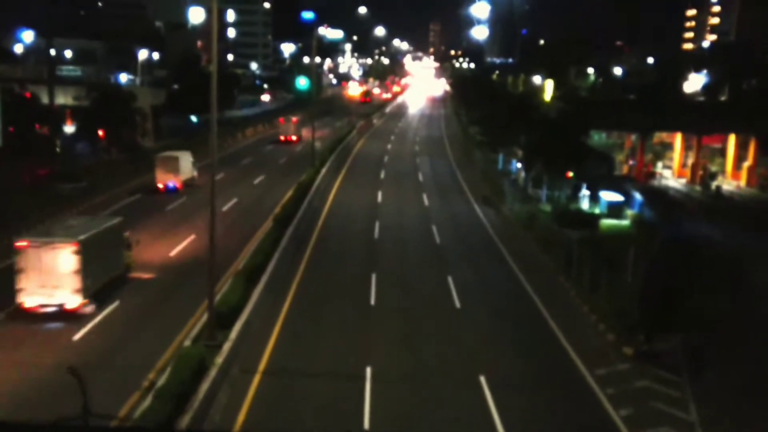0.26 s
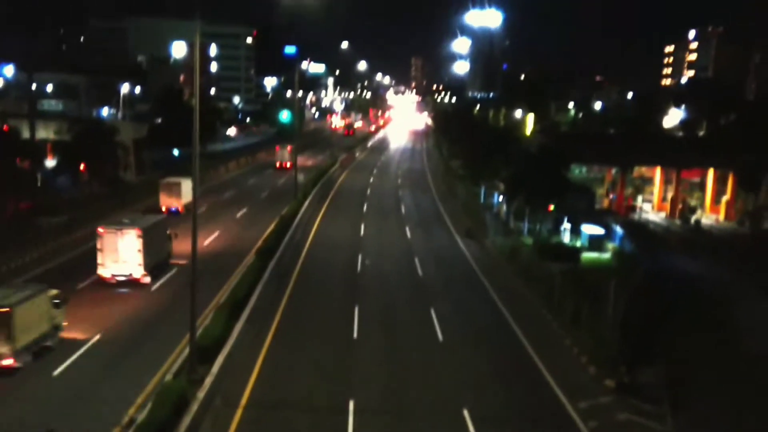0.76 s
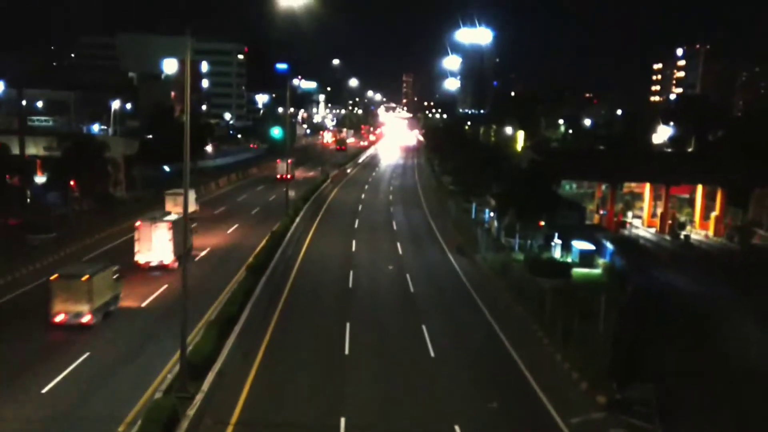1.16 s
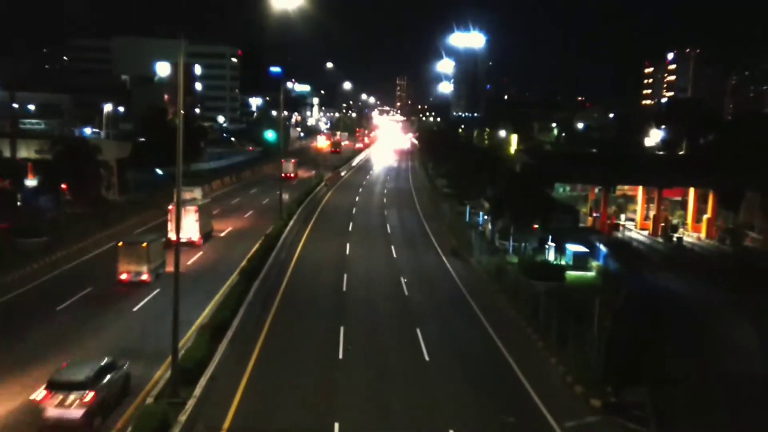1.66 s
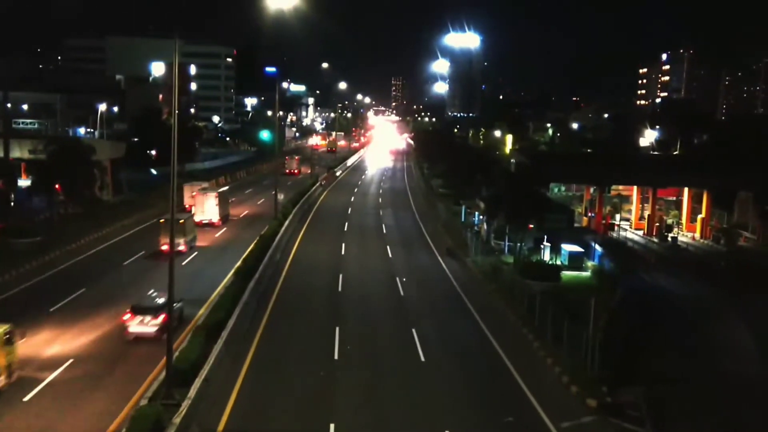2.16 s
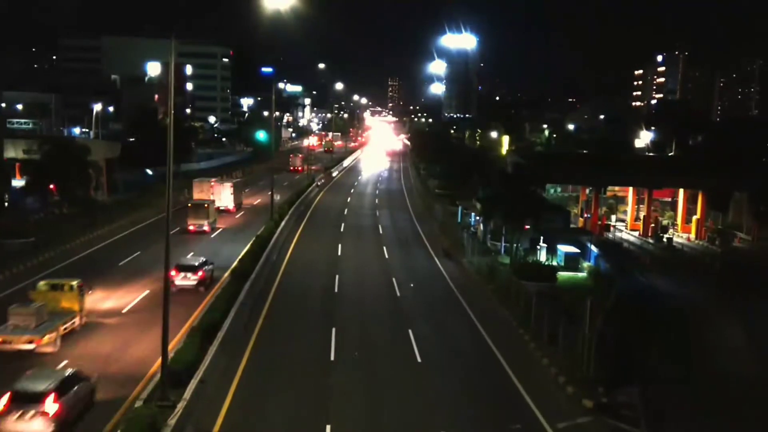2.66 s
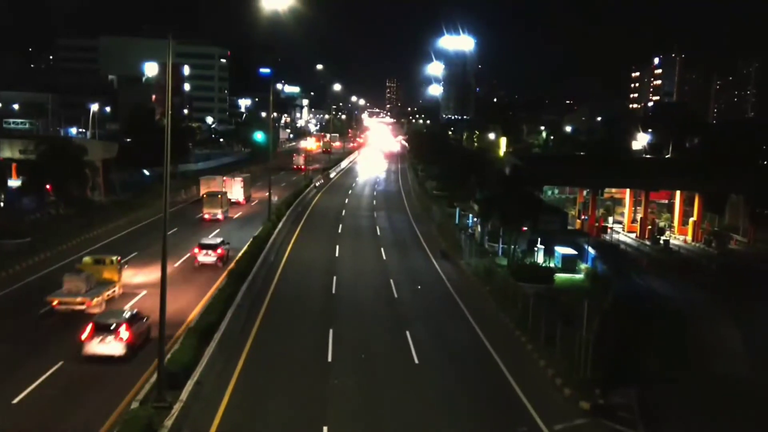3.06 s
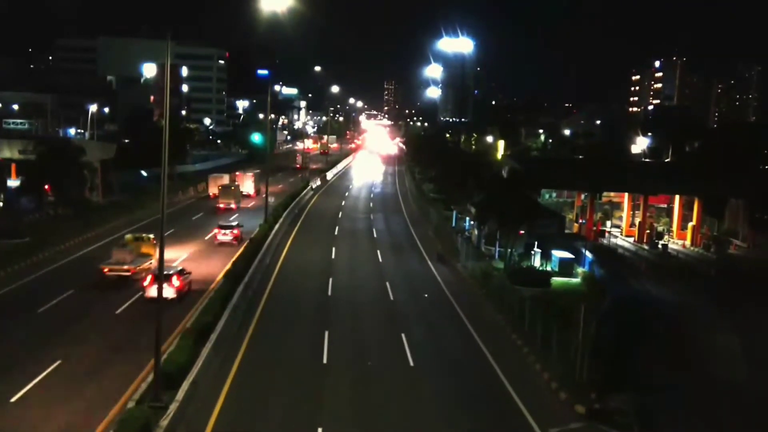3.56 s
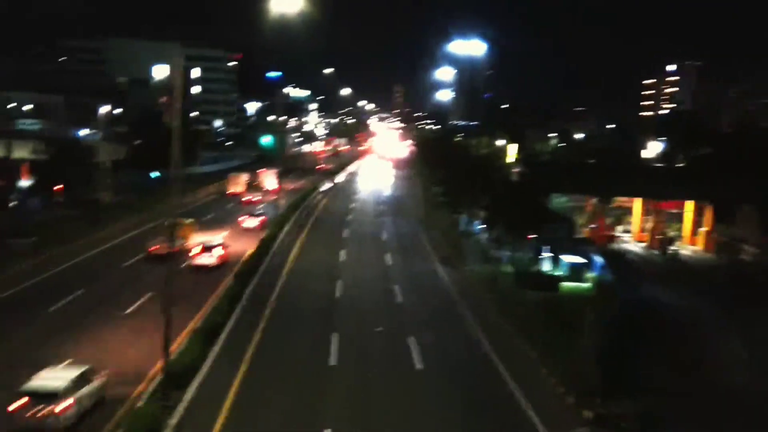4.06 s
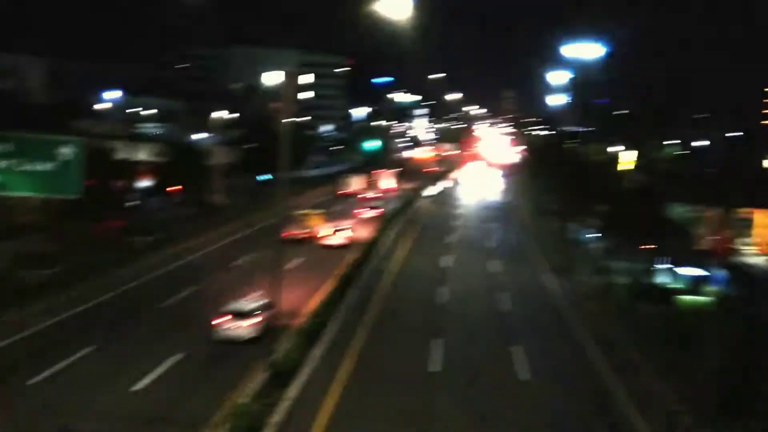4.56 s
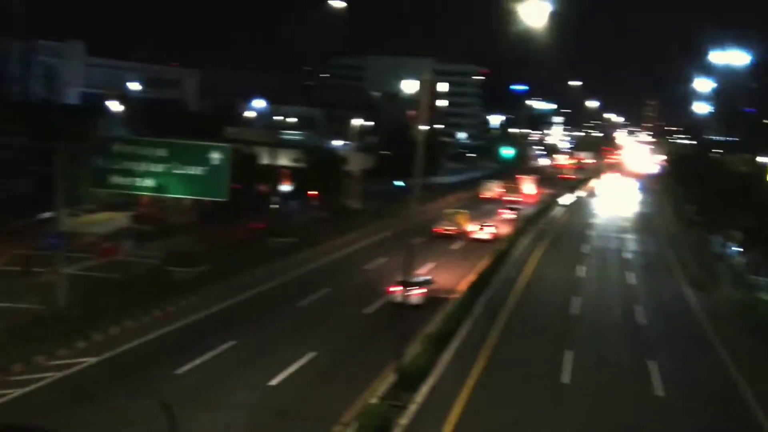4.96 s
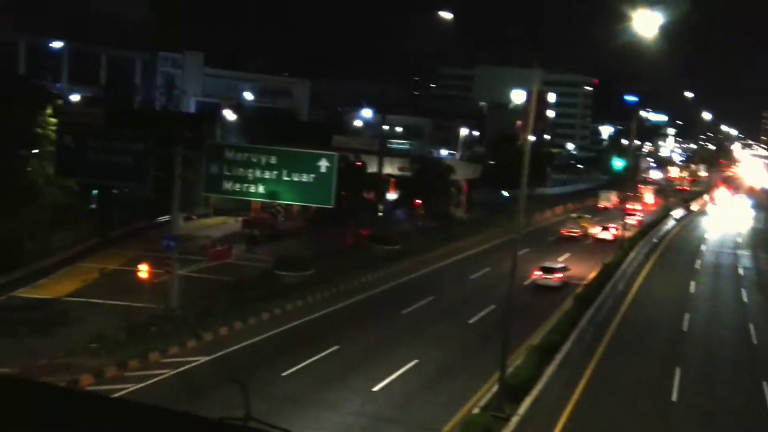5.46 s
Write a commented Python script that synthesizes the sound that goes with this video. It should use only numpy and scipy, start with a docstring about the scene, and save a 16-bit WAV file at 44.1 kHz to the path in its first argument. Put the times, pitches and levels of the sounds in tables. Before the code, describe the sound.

Night highway traffic heard from a footbridge: rumbling trucks and hissing tyres pass below, then thin to a distant roar as wind buffets the microphone.

```python
"""Night traffic below a footbridge

Broadband tyre and body noise is shaped from random spectra, with short inverted echoes close to
the microphones. Truck engines drone as harmonics of a crank; engine notes and a thin whistle glide
as enveloped sines. Wind, mostly later, is filtered noise and short slaps at two hand-held ports."""
import sys
import numpy as np
from scipy import signal
from scipy.io import wavfile
from scipy.ndimage import uniform_filter1d, minimum_filter1d

SR = 44100
rng = np.random.default_rng(int(sys.argv[2]) if len(sys.argv) > 2 else 0)


def log_audio(samples):
    """Write samples as a 16-bit WAV file to the path given in sys.argv[1]."""
    # one column per channel
    frames = np.atleast_2d(samples).T
    # limit to full scale, then quantise
    limited = np.clip(frames, -1, 1)
    pcm = np.round(limited * 32767).astype(np.int16)
    wavfile.write(sys.argv[1], SR, pcm)


N = 251811  # samples

# Spectral densities of the traffic, each a near and a far curve: f/Hz, relative level/dB
RUMBLE_SPECTRA = [(15, -47), (25, -14), (75, -4), (147, -10.5), (167, -5.5), (285, -16.5), (362, -12),
                  (436, -20), (600, -21.5), (780, -21.5), (1320, -120)], [(15, -35), (25, 6), (70, 0.5),
                  (108, -2), (194, -9.5), (260, 2), (321, 2), (600, -17.5), (780, -41), (1320, -120)]
ROAR_SPECTRA = [(280, -25), (480, -7), (520, -0.5), (651, -16), (904, 2), (1330, -3), (1900, -51),
                (2470, -14.5), (4180, -120)], [(280, -48), (480, -2.5), (797, -2.5), (1080, 1), (1320, 0.5),
                (1710, -18), (1900, -7), (2470, -19.5), (4180, -120)]
SWISH_SPECTRA = [(880, -10.5), (1500, -5.5), (1720, -7.5), (1830, -9.5), (2210, -12), (4000, -22),
                 (5200, -24), (8800, -120)], [(880, -74), (1500, -2), (1720, -5), (1950, -8), (2180, -5.5),
                 (2450, -13), (2990, -12), (3170, -13.5), (4000, -39.5), (5200, -29.5), (8800, -120)]
HISS_SPECTRA = [(1940, -7), (3300, -2.5), (4450, -10), (5130, -2), (6090, -7.5), (7190, -5), (8710, -3),
                (11000, -9), (12200, -12), (14500, -23), (15200, -37)], [(1940, -35), (3300, -5),
                (4320, 18.5), (5060, 2), (5640, -4.5), (6580, 15.5), (7760, 8), (9110, 12), (12900, -6.5),
                (15200, -36)]
# Boom of a lorry's box body, and a band of tyre song: f/Hz, relative level/dB
BOX_SPECTRUM = [(270, -56), (315, -28), (345, 9), (378, 23.5), (430, -62)]
SONG_SPECTRUM = [(2150, -40), (2330, 7), (2520, 3), (2750, -13), (3000, -48)]
# Stretches of boom and of song: start t/s, end t/s, level/dB
BOX_STRETCHES = [(0, 1.08, -24), (2.15, 2.5, -28)]
SONG_STRETCHES = [(4.44, 4.647, -37.5), (4.772, 4.92, -38)]
# Traffic stream: t/s, rumble level/dB, tyre roar level/dB, swish level/dB
TRAFFIC_LEVELS = [(0.0, -16, -26.5, -31.5), (0.33, -19, -21, -26.5), (0.75, -19, -24, -33.5),
                  (0.87, -19.5, -20, -26.5), (1.05, -20, -23, -28.5), (1.2, -20.5, -26, -31),
                  (1.54, -23, -28.5, -31), (2.02, -22.5, -27.5, -31.5), (2.25, -22.5, -23, -28.5),
                  (2.6, -23, -24.5, -30.5), (2.95, -22, -23.5, -30.5), (3.36, -29, -25.5, -38),
                  (3.72, -27.5, -33.5, -36.5), (3.97, -20.5, -32, -42.5), (4.34, -36.5, -26, -40),
                  (4.5, -27.5, -27, -41), (4.62, -28, -27.5, -36), (4.71, -34, -26.5, -41),
                  (4.8, -25.5, -27.5, -33.5), (4.95, -26, -21.5, -32), (5.1, -22.5, -22.5, -37.5),
                  (5.28, -22.5, -21.5, -38), (5.45, -22, -22.5, -39.5), (5.71, -25.5, -22.5, -36)]
# Hiss of the nearest wheels: t/s, level/dB, left-right balance/dB, treble slope/(dB per octave)
WHEEL_HISS = [(0, -32.5, -2, -9), (.35, -32.5, -1.5, -6.5), (.79, -38, 1.5, -1.5), (.87, -31, -2, -4.5),
              (1.4, -31, 0.5, -4), (1.68, -28.5, 0.5, 1), (1.82, -24, 4.5, -1), (1.92, -31, -6, -3),
              (2.02, -26.5, -12, 0), (2.15, -24, -8.5, 0.5), (2.4, -25.5, -10.5, -3.5),
              (2.56, -32, -8.5, -2.5), (2.9, -30, -4.5, -6), (3.2, -46, -8, 4), (3.54, -54.5, -9, 7),
              (3.74, -47, -11, 1.5), (3.795, -39.5, -9, -8), (3.815, -57, -12, 2.5),
              (4.3, -58.5, -4.5, 5.5), (4.5, -50.5, -10.5, -6), (4.77, -54.5, -4, 2),
              (4.94, -44.5, -5.5, 3), (5.34, -43, 4, -9.5), (5.42, -49.5, 1, -7.5), (5.71, -43.5, -2, -14)]
# Distance and echo: t/s, far share [0-1], echo strength [0-1], moving lag left/ms, right/ms
FAR_AND_ECHO = [(0, 0, .2, .75, .7), (1.2, 0, .12, .75, .7), (2.3, .1, .2, .75, .7),
                (3.2, .55, .6, .73, .69), (4.1, .9, .7, .72, .69), (4.6, 1, .75, .6, .66),
                (5.1, 1, .65, .59, .65), (5.7, 1, .65, .58, .6)]
# Likeness of the two ports: f/Hz, coherence [0-1], phase lead of left for near traffic/rad
COHERENCE = [(60.4, 1, 0.078), (192, 0.86, 0.33), (370, 0.66, 0.56), (774, 0.52, 0.92), (1420, 0.64, 2.53),
             (2320, 0.78, 1.12), (4060, 0.12, 2.55), (9000, 0.087, 1.6)]
# Lag of the fixed echo: left/ms, right/ms
FIXED_LAG_MS = .92, .92

# Heard crank pitch of a truck passing below, a slight rise, then lower as it recedes: t/s, f/Hz
TRUCK_CRANK = [(1.05, 48.4), (1.55, 49.12), (1.95, 48.6), (2.25, 47.4), (2.7, 46.1), (3.1, 45.3)]
# Stretches of each engine order (multiple of crank f): start t/s, end t/s, level/dB
TRUCK_ORDERS = {"1": [(2.02, 2.73, -25.5)], "1.5": [(1.1, 1.9, -21)], "2": [(1.47, 1.96, -15.5),
                (2.32, 2.85, -17.5)], "3": [(2.2, 2.5, -15.5), (2.5, 2.74, -16.5)],
                "4": [(2.25, 3.1, -23.5)], "5": [(.8, .95, -30), (1.08, 1.3, -25), (1.5, 1.9, -25.5),
                (2.1, 2.6, -32)], "6": [(2.2, 2.6, -32.5)]}
# Gliding tones of engines, of a lorry leaving and of a thin whistle: start t/s, end t/s,
# level/dB before the mid-glide swell, first f/Hz, last f/Hz, mid-glide t/s, glide time constant/s
ENGINE_NOTES = [(0, 0.31, -19.5, 120, 115.2, 0.082, 0.13), (0.3, 0.91, -22.5, 124, 140.5, 0.56, 0.17),
                (1.1, 1.68, -15.5, 143, 145.8, 1.403, 0.28), (1.67, 2.295, -14.5, 148, 90.5, 2.09, 0.14),
                (-0.1, 0.665, -31, 322, 360, 0.507, 0.14), (.48, .9, -24, 81, 78.5, 0.64, 0.18),
                (.87, 1.3, -21.5, 96.5, 100.5, 1.105, 0.13), (3.16, 3.42, -18, 140, 137, 3.25, 0.14)]
LORRY_NOTES = [(0.1, .5, -20.5, 188, 183.2, 0.38, 0.093), (.63, .8, -21.5, 170, 196, 0.62, 0.052),
               (.82, 1.08, -25, 199.4, 210.5, 0.902, 0.17), (.88, 1.04, -20.5, 178, 185, 0.99, 0.11)]
WHISTLE_NOTES = [(5.16, 5.32, -44, 1410, 1570, 5.4, 0.055), (5.54, 5.72, -43, 1463, 1660, 5.6, 0.054)]

# Spectral densities of the wind, slow push and fast eddies: f/Hz, relative level/dB
PUSH_SPECTRUM = [(20, -70), (45, -7.5), (70, -1.5), (110, -4), (170, -12.5), (300, -27), (600, -54),
                 (1200, -120)]
EDDY_SPECTRUM = [(60, -35), (130, 0), (200, -1), (350, -11), (600, -25.5), (1000, -23.5), (1600, -55),
                 (3000, -120)]
# Gusts at the left port, then the right: start t/s, end t/s, level/dB
GUST_STRETCHES = [
    [(.95, 1.08, -15), (3.1, 3.5, -21.5), (3.5, 3.8, -13), (3.8, 4.06, -14.5), (4.06, 4.15, -24.5),
     (4.15, 4.35, -17.5), (4.35, 4.53, -24), (4.54, 4.66, -19), (4.63, 4.97, -21.5), (4.97, 5.05, -17),
     (5.05, 5.25, -27.5), (5.58, 5.72, -17.5)],
    [(2.78, 3.15, -13), (3.15, 3.6, -12.5), (3.6, 3.82, -13), (3.82, 4.15, -14), (4.15, 4.36, -17),
     (4.36, 4.62, -21), (4.62, 4.67, -19.5), (4.67, 4.72, -13), (4.72, 4.84, -17.5), (4.84, 5.0, -16),
     (5.0, 5.3, -27), (5.3, 5.38, -15), (5.38, 5.6, -21), (5.6, 5.72, -15.5)],
]
# Single buffets, sharp or deep: t/s, peak level/dB about the middle, left-right balance/dB, f/Hz
BUFFET_SLAPS = [(3.095, -12, -18, 450), (3.149, -15, -25, 500), (3.522, -20.5, 21, 800),
                (3.565, -18, 22, 634), (3.591, -18, 25, 596), (3.747, -16, 26, 550), (3.756, -4, 4, 121),
                (3.783, -16, 20, 523), (3.847, -25, 27, 704), (3.945, -20.5, 28, 630),
                (3.956, -11, -11, 90), (4.014, -15, 21, 520), (4.108, -5.5, -15.5, 130),
                (4.197, -24, -20, 850), (4.266, -10, -13, 110), (4.562, -7.5, 11, 75), (4.624, -9, -12, 70),
                (4.692, -8.5, -21, 226), (5.022, -9.5, 17, 138), (5.33, -6, -16, 168)]

TRAFFIC_PAN_DB = -5.5  # the busy lanes lie to the right
TREBLE_LEFT_DB = 7.5  # left-right balance per octave above 6 kHz, for near traffic
LORRY_OCTAVE_DB = -7.5
FADE_S, GUST_EDGE_S = 0.15, 0.025
SWELL_DB = 2.5  # each gliding tone swells around its mid-glide time
FLUTTER_DB = 1.07  # rms
SHARED = 0.26  # part of the slow push that crosses to the other port
EDGE_HZ = 15200


def stream():
    """Random-phase synthesis: noise spectra of many vehicles, coloured and modulated frame by frame."""
    frames, hz = N // 256 + 5, np.fft.rfftfreq(1024, 1 / SR)
    t = np.arange(frames) * 256 / SR
    far, echo_strength, *moving_ms = follow(FAR_AND_ECHO, t)
    far = np.clip(far, 0, 1)
    a, b, c, d, patches, streaks = rng.standard_normal((frames, 513, 6)).T
    noise = port_pair(a + 1j * b, c + 1j * d, hz, far)
    noise = noise * np.sqrt(traffic_power(t, hz, far)) * body_echo(hz, echo_strength, moving_ms)
    # the treble leans left when near, right once far
    lean_db = TREBLE_LEFT_DB * np.log2(np.maximum(hz / 6000, 1))[:, None] * (1 - 2 * far)
    bright_db = follow(WHEEL_HISS, t)[2]
    slope_octaves = np.log2(np.maximum(hz / 3500, 1) / 2 + 1 / 2)[:, None]
    noise = noise * sides(lean_db) * gain_of(bright_db * slope_octaves)
    noise = noise * gain_of(uneven_db(patches, streaks, hz, far))
    return signal.istft(noise, nperseg=1024, noverlap=768)[1][:, :N]


def traffic_power(t, hz, far):
    """Incoherent addition: the powers of six noise colours sum at each port, frequency and time."""
    rumble_db, roar_db, swish_db = follow(TRAFFIC_LEVELS, t)
    hiss_db, hiss_pan, _ = follow(WHEEL_HISS, t)
    box_db = 20 * np.log10(stretches(BOX_STRETCHES, t, FADE_S) + 1e-6)
    song_db = 20 * np.log10(stretches(SONG_STRETCHES, t, FADE_S) + 1e-6)
    lanes_pan = np.full(len(t), TRAFFIC_PAN_DB)
    # near and far spectra, level/dB, balance/dB, band that sets the level (f/Hz)
    colours = [
        (RUMBLE_SPECTRA, rumble_db, np.full(len(t), -5.4), (200, 500)),
        ((BOX_SPECTRUM, BOX_SPECTRUM), box_db, np.full(len(t), -5.3), (200, 500)),
        (ROAR_SPECTRA, roar_db, lanes_pan, (550, 1600)),
        (SWISH_SPECTRA, swish_db, lanes_pan, (1600, 3100)),
        ((SONG_SPECTRUM, SONG_SPECTRUM), song_db, lanes_pan, (1600, 3100)),
        (HISS_SPECTRA, hiss_db, hiss_pan, (3500, 14000)),
    ]
    power = 0
    for (near, distant), db, pan, (low_hz, high_hz) in colours:
        near_db, distant_db = read(near, hz)[:, None], read(distant, hz)[:, None]
        shape = gain_of((1 - far) * near_db + far * distant_db)
        shape = shape / np.linalg.norm(shape[(hz > low_hz) & (hz < high_hz)], axis=0)
        port_gain = (gain_of(db) * sides(pan))[:, None]
        power = power + (shape * port_gain) ** 2
    return power


def body_echo(hz, strength, moving_ms):
    """Comb filtering: inverted echoes with a fixed and a moving lag notch the spectrum."""
    # the echo is weak in bass and treble
    reflecting = np.clip(hz / 900, 0, 1) / (1 + (hz / 7000) ** 2)
    fixed_share = np.clip(strength, 0, .9) * reflecting[:, None]
    fixed_lag_ms = np.reshape(FIXED_LAG_MS, (2, 1, 1))
    moving_lag_ms = np.array(moving_ms)[:, None]
    echo = 1
    for lag_ms, share in ((fixed_lag_ms, fixed_share), (moving_lag_ms, 0.58 * fixed_share)):
        delayed = share * np.exp(-2j * np.pi * hz[:, None] * lag_ms * 1e-3)
        echo = echo * np.abs(1 - delayed) / np.sqrt(1 + share ** 2)
    return echo


def port_pair(left, other, hz, far):
    """Partial coherence: the right port mixes a phase-delayed left signal with independent noise."""
    table = np.array(COHERENCE)
    same = np.clip(read(table[:, [0, 1]], hz)[:, None], 0, 1)
    lead = read(table[:, [0, 2]], hz)[:, None]
    lead = lead * (1 - 0.47 * far)  # the microphones turn towards the far traffic
    right = same * left * np.exp(-1j * lead) + np.sqrt(1 - same ** 2) * other
    return np.array([left, right])


def uneven_db(patches, streaks, hz, far):
    """Random modulation: smoothed noise makes levels vary over time and frequency."""
    # axis 0 is frequency, axis 1 time; streaks are narrow colours that come and go
    streaks = evened(uniform_filter1d(uniform_filter1d(streaks, size=4, axis=0), size=30, axis=1))
    patches = evened(uniform_filter1d(uniform_filter1d(patches, size=14, axis=0), size=14, axis=1))
    flicker = wander(count=patches.shape[1], size=3)[:, None]
    treble = np.clip(hz / 5000, 0, 1)[:, None]
    patch_db = (0.8 + 1.0 * treble * (1 + far)) * patches  # most uneven in far treble
    flicker_db = (0.89 + 0.11 * treble) * flicker
    return patch_db + flicker_db + 2.0 * far * streaks


def truck():
    """Harmonic series: engine orders are multiples of one wavering crank frequency."""
    t = np.arange(N) / SR
    crank = follow(TRUCK_CRANK, t)[0] * (1 + .003 * wander(count=N, size=900)[0])
    drone = 0
    for order, rows in TRUCK_ORDERS.items():
        drone = drone + engine(float(order) * crank, stretches(rows, t, FADE_S), 0, -6.5)
    return drone


def lorry():
    """Harmonic pair: each gliding engine note carries its octave."""
    return gliding_tones(LORRY_NOTES, 0.0066, -5.5, LORRY_OCTAVE_DB)


def engine_notes():
    """Frequency glide: single engine notes pull up or fall away."""
    return gliding_tones(ENGINE_NOTES, 0.0038, -6.5)


def whistle():
    """Frequency glide: a thin, nearly pure tone slides up."""
    return gliding_tones(WHISTLE_NOTES, 0.0042, -8.0)


def gliding_tones(rows, waver, pan_db, octave_db=-120):
    """Frequency modulation: pitch follows an S-curve, as when a vehicle passes or changes gear."""
    t, out = np.arange(N) / SR, 0
    for a, b, db, first_hz, last_hz, middle, glide in rows:
        curve = np.tanh((t - middle) / glide)
        hz = first_hz + (last_hz - first_hz) * (1 + curve) / 2
        level = stretches([(a, b, db)], t, FADE_S) * gain_of(SWELL_DB * (1 - curve ** 2))
        out = out + engine(hz, level, waver, pan_db)
        out = out + engine(2 * hz, level * gain_of(octave_db), waver, pan_db)
    return out


def engine(hz, level, waver, pan_db):
    """Phase integration: a sine of wavering frequency whose level swells and sags at random."""
    drift, flutter = wander(count=N, size=3500)
    turns = np.cumsum(hz * (1 + waver * drift)) / SR
    tone = np.sin(2 * np.pi * (turns + rng.random()))
    # drift and flutter are one curve each, alike at both ports
    return np.sqrt(2) * level * gain_of(FLUTTER_DB * flutter) * tone * sides(pan_db)[:, None]


def wind():
    """Turbulence: lumpy noise at each port, with eddies that grow faster than the push."""
    t = np.arange(N) / SR
    level = np.array([stretches(port, t, GUST_EDGE_S) for port in GUST_STRETCHES])
    lumps = np.tanh(wander(count=N, size=350))
    push = rng.standard_normal((2, N))
    slow = level * evened(gain_of(3.1 * lumps) * (push + SHARED * push[::-1]))
    eddies = evened(gain_of(6.6 * lumps) * rng.standard_normal((2, N)))
    fast = 1.77 * level ** 1.49 * eddies  # strong gusts are brighter
    return coloured(slow, PUSH_SPECTRUM) + coloured(fast, EDDY_SPECTRUM) + buffets()


def buffets():
    """Pressure transients: short slaps of either sign where eddies break."""
    slaps = np.zeros((2, N))
    signs = rng.choice([-1., 1.], len(BUFFET_SLAPS))
    for (s, peak_db, pan_db, hz), sign in zip(BUFFET_SLAPS, signs):
        start = round(s * SR)
        slaps[:, start:start + 3000] += sign * gain_of(peak_db) * sides(pan_db)[:, None] * slap(hz)
    return slaps


def slap(hz):
    """Damped oscillation: a cycle or two of pressure with a soft start."""
    turns = np.arange(3000) / SR * hz
    envelope = (turns / .9 * np.exp(1 - turns / .9)) ** 3
    return np.sin(2 * np.pi * turns) * envelope


def coloured(x, points):
    """Minimum-phase filtering: a causal response derived from the log spectrum."""
    hz = np.abs(np.fft.fftfreq(16384, 1 / SR))
    log_gain = np.log(gain_of(read(points, hz)) + 1e-6)
    response = np.fft.ifft(np.exp(np.conj(signal.hilbert(log_gain)))).real
    taps = response[:4096] * np.hanning(8192)[4096:]
    return signal.oaconvolve(x, taps[None] / np.linalg.norm(taps), axes=1)[:, :N]


def stretches(rows, t, edge_s):
    """Amplitude envelope: gain swells, holds and fades for each (start t/s, end t/s, level/dB)."""
    gain = 0
    for a, b, db in rows:
        gain = gain + gain_of(db) * np.clip(np.minimum(t - a, b - t) / edge_s + .5, 0, 1)
    return gain


def gain_of(db):
    """Decibel law: level to amplitude ratio."""
    return 10 ** (np.asarray(db) / 20)


def evened(x):
    """Normalisation: scales to rms 1."""
    return x / np.sqrt(np.mean(np.abs(x) ** 2) + 1e-20)


def read(points, hz):
    """Interpolation of a spectrum table on a log-frequency axis."""
    f, value = np.transpose(points)
    return np.interp(np.log(hz + 1), np.log(f + 1), value)


def follow(rows, t):
    """Linear interpolation of a curve table's columns at times t."""
    s, *columns = np.transpose(rows)
    return [np.interp(t, s, c) for c in columns]


def sides(pan_db):
    """Level-difference stereo: left and right gains about the middle."""
    return np.array([gain_of(pan_db / 2), gain_of(-pan_db / 2)])


def wander(count, size):
    """Smoothed noise: two slow random curves of joint rms 1."""
    return evened(uniform_filter1d(uniform_filter1d(rng.standard_normal((2, count)), size), size))


def scene():
    """Superposition: all sources add at the two ports."""
    return stream() + truck() + lorry() + engine_notes() + whistle() + wind()


def record(dry):
    """Peak limiting: both channels duck at loud peaks and recover, then the band is limited."""
    highpass = signal.butter(2, 48, "highpass", fs=SR, output="sos")
    dry = signal.sosfilt(highpass, dry)  # the microphone drops deep bass
    peak_db = 20 * np.log10(np.abs(dry).max(0) + 1e-6)
    fall = np.arange(N) * 80. / SR  # recovers 80 dB a second
    over_db = np.maximum(np.maximum.accumulate(peak_db + fall) - fall, 0)
    ahead_db = -minimum_filter1d(-over_db, size=201)  # ducks just before the peak
    ducked = dry / gain_of(uniform_filter1d(ahead_db, size=201))
    lowpass = signal.firwin(511, EDGE_HZ, window=("kaiser", 9), fs=SR)
    return signal.oaconvolve(ducked, lowpass[None], "same")


dry = scene()
out = record(dry)
log_audio(out)
```